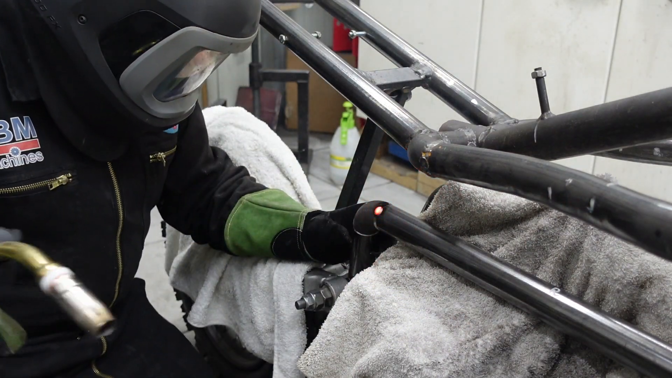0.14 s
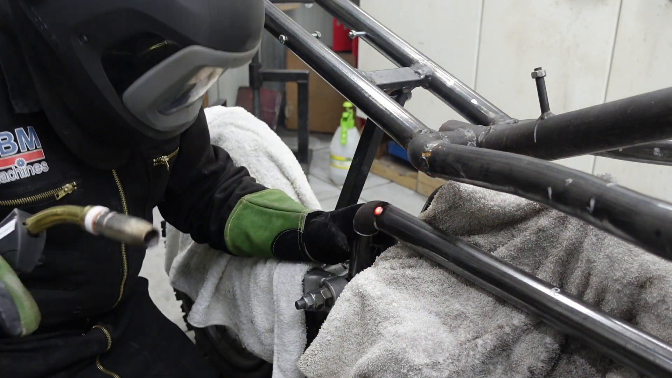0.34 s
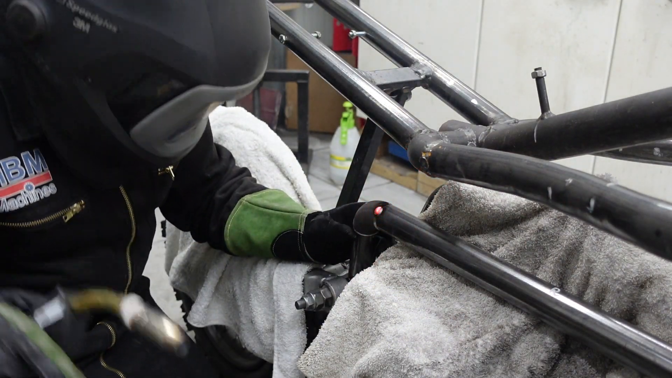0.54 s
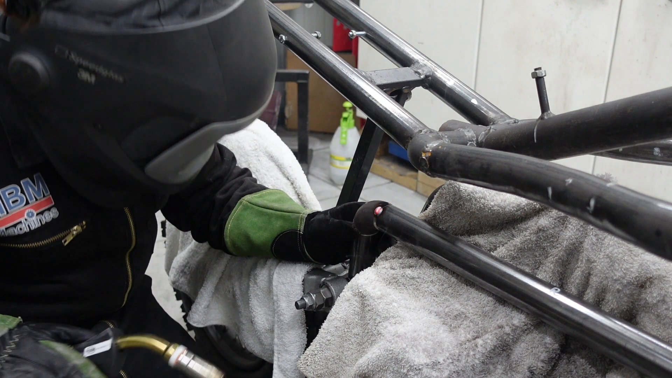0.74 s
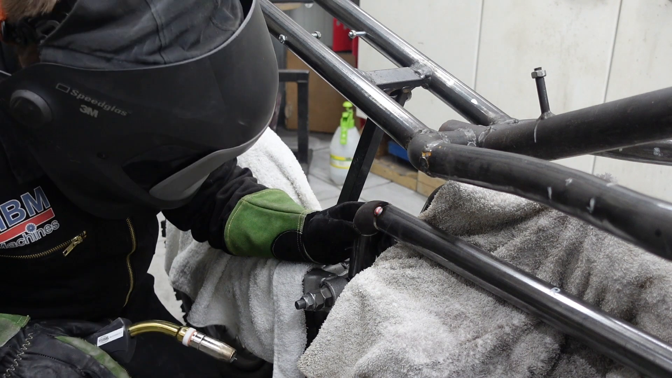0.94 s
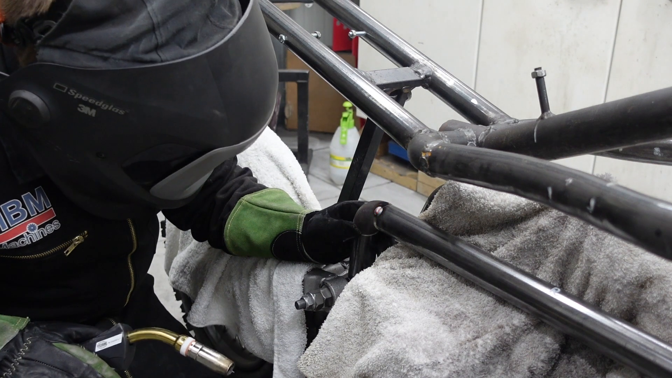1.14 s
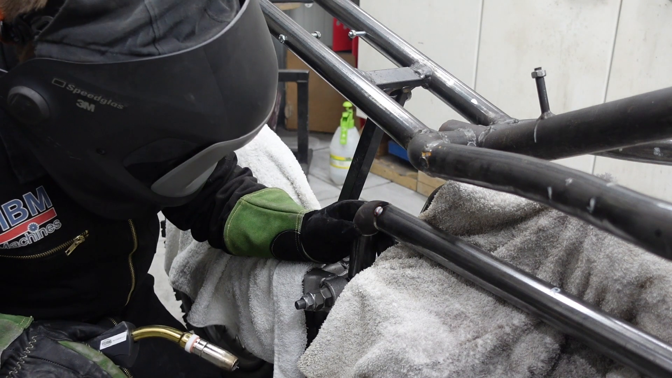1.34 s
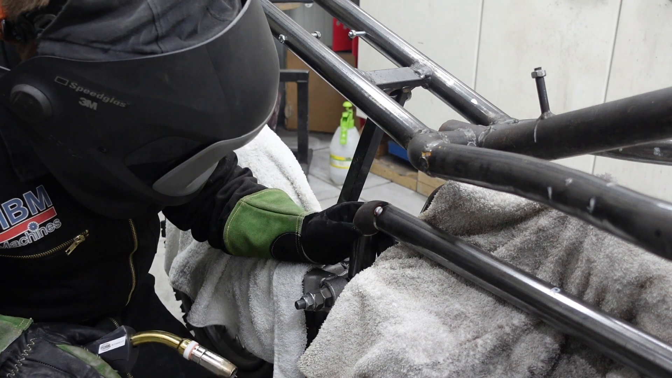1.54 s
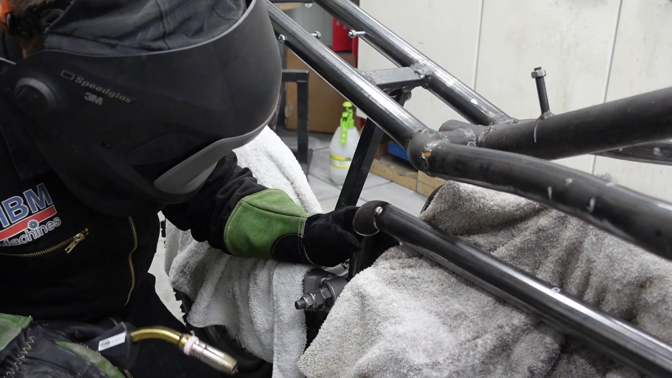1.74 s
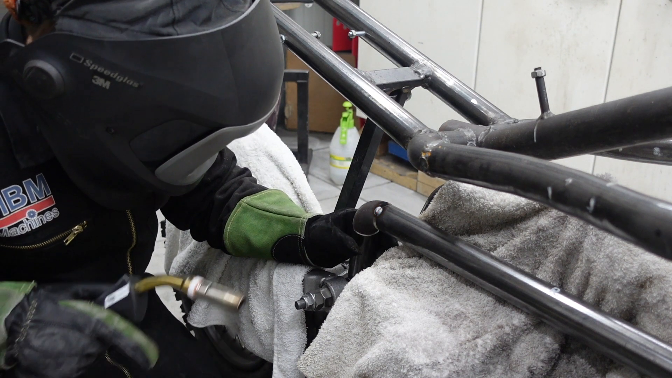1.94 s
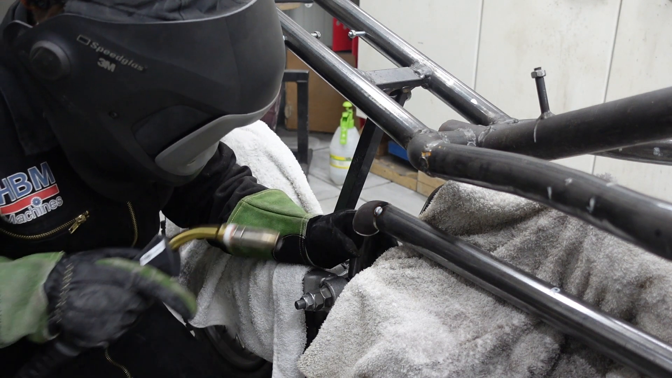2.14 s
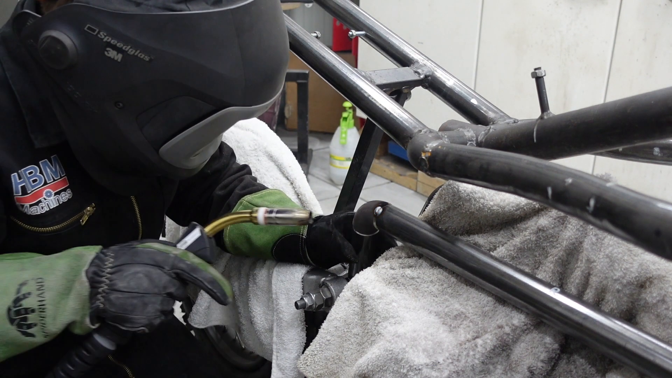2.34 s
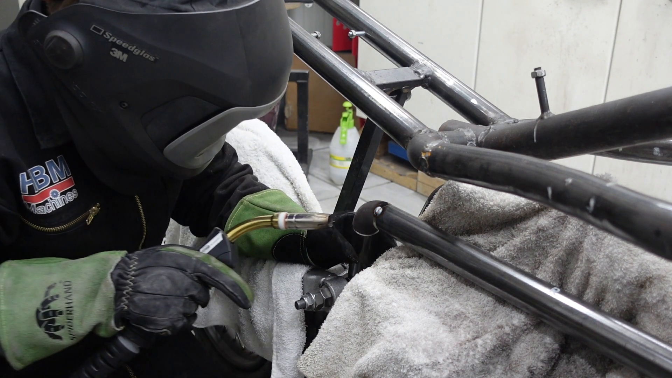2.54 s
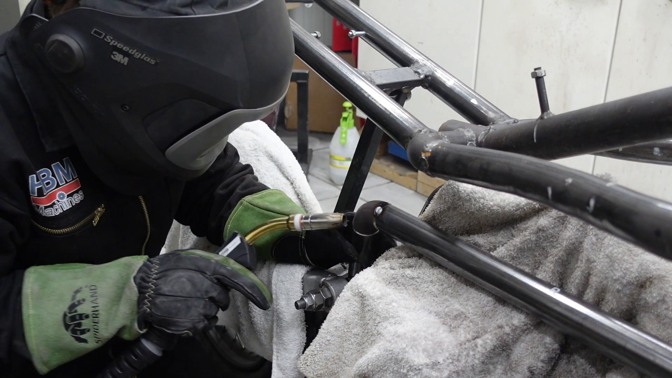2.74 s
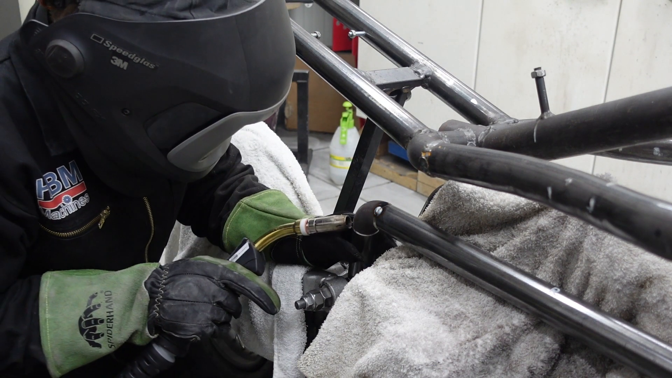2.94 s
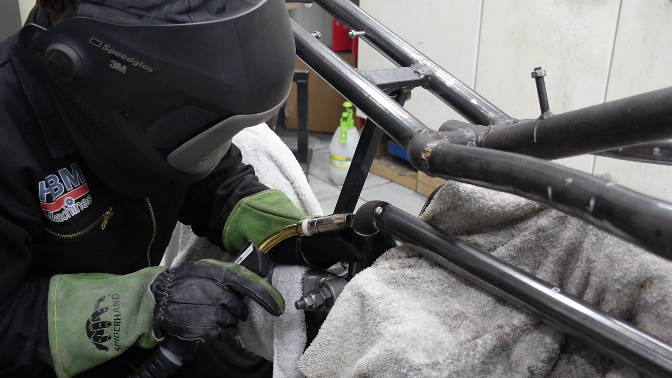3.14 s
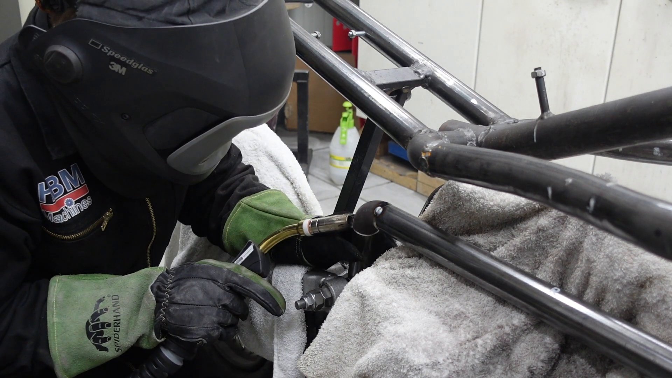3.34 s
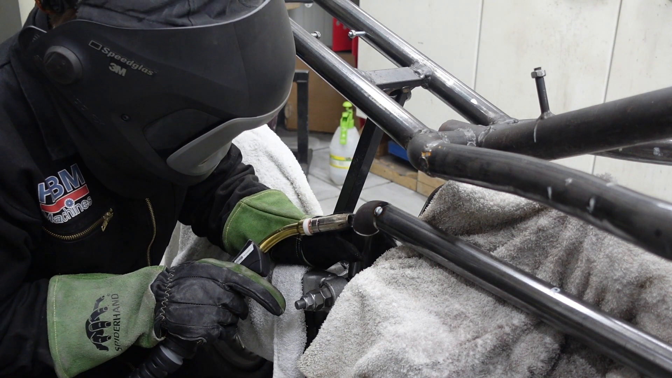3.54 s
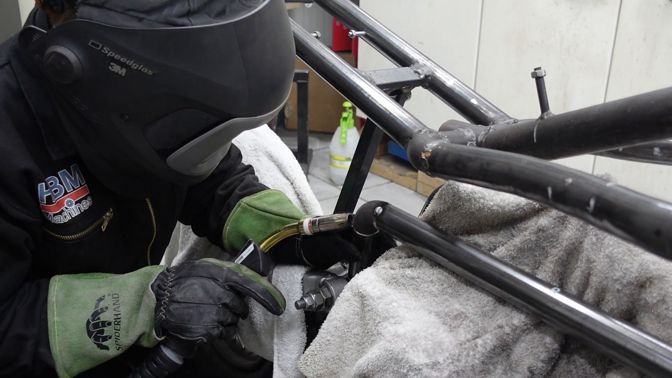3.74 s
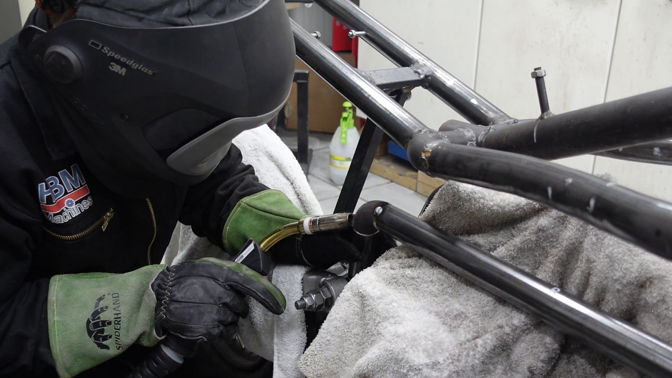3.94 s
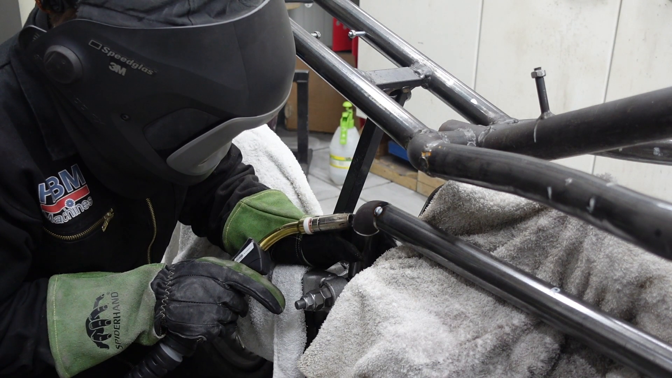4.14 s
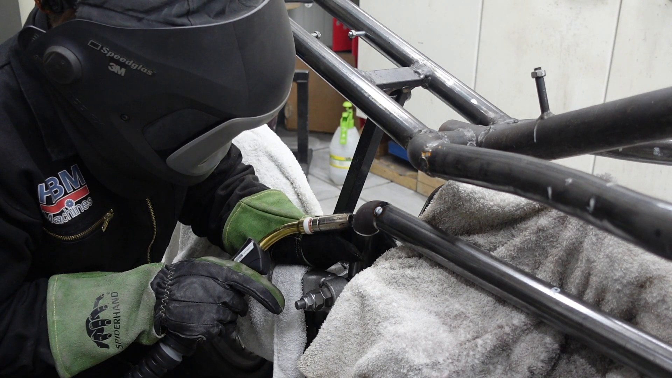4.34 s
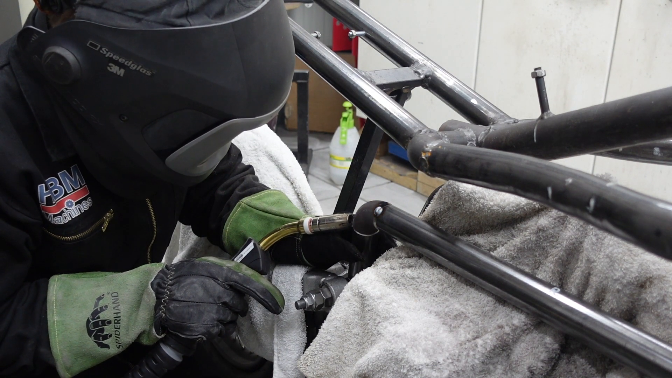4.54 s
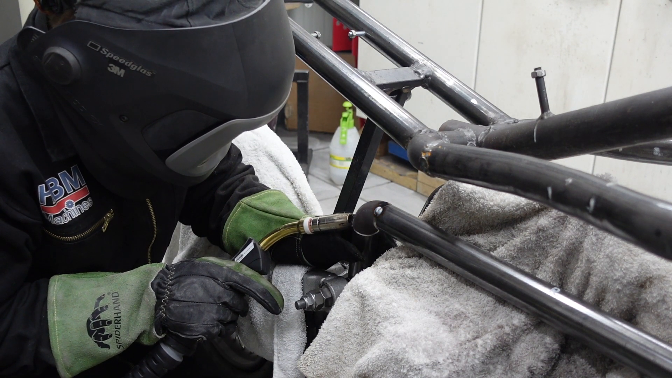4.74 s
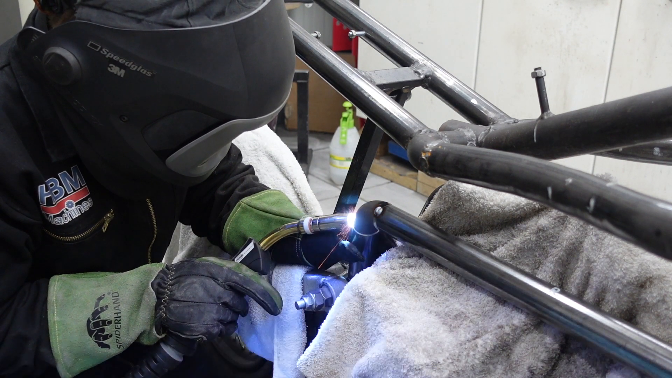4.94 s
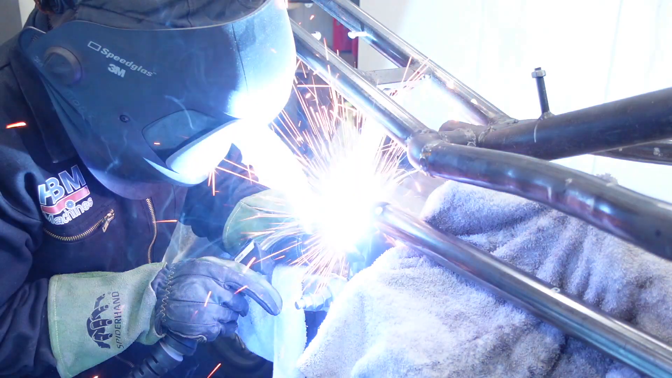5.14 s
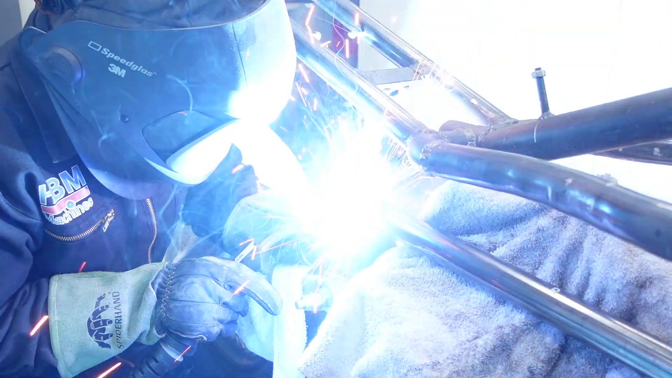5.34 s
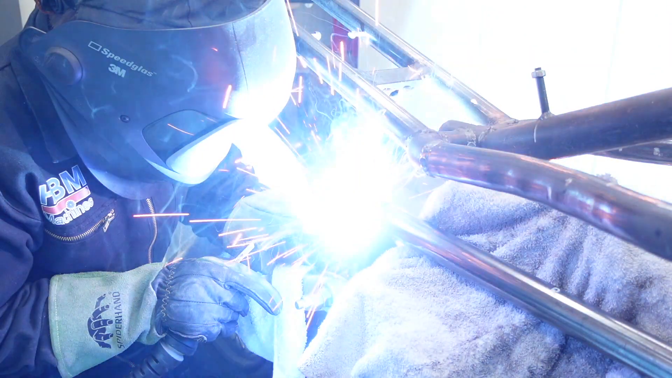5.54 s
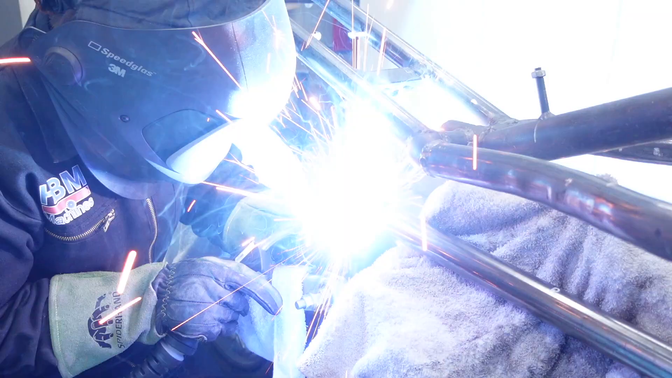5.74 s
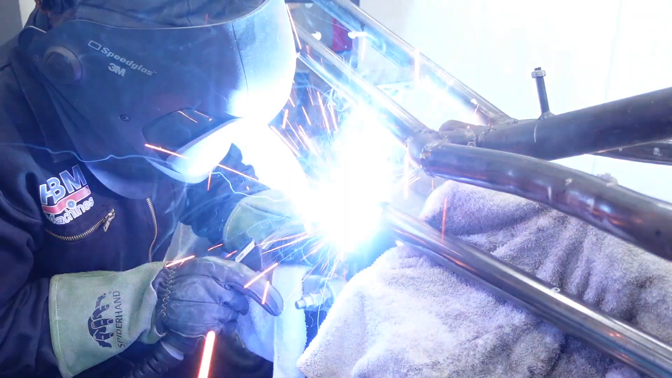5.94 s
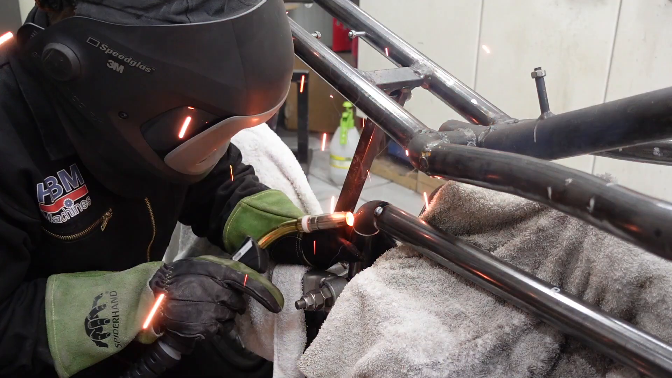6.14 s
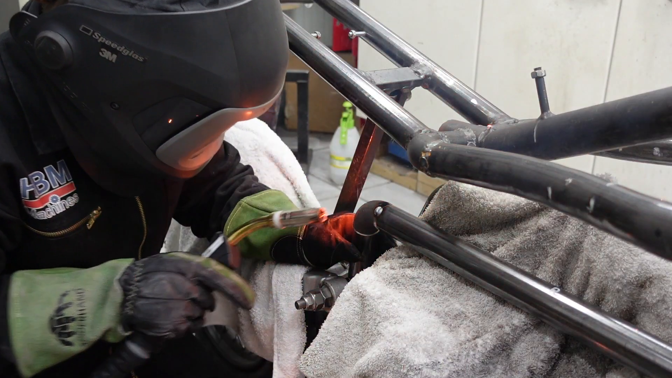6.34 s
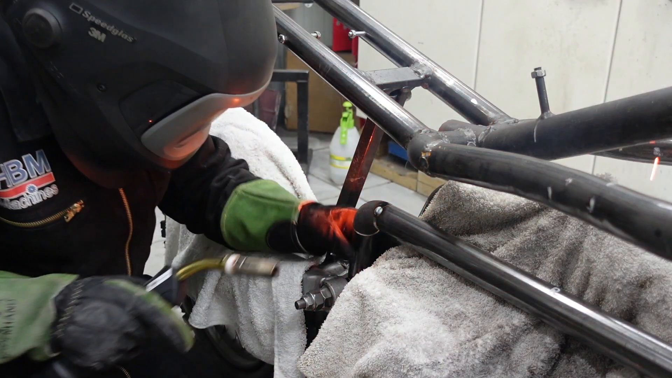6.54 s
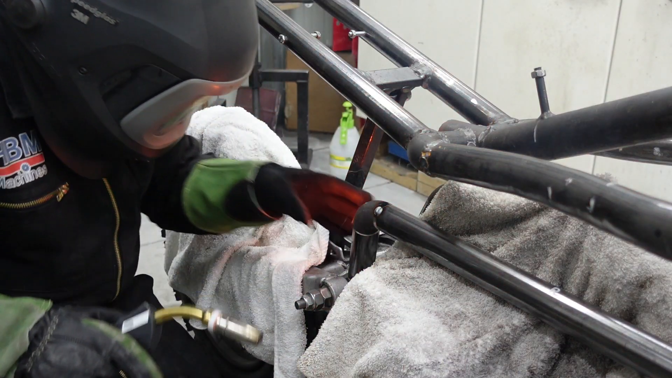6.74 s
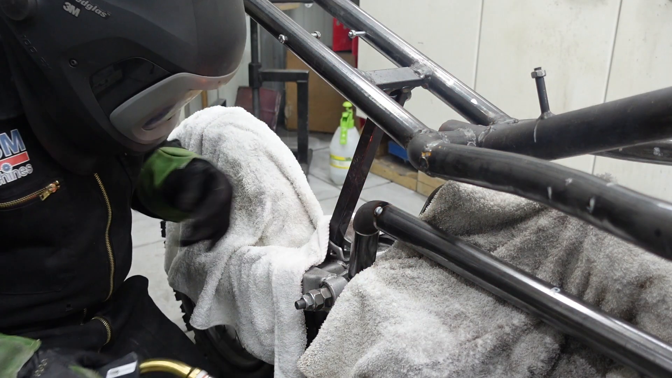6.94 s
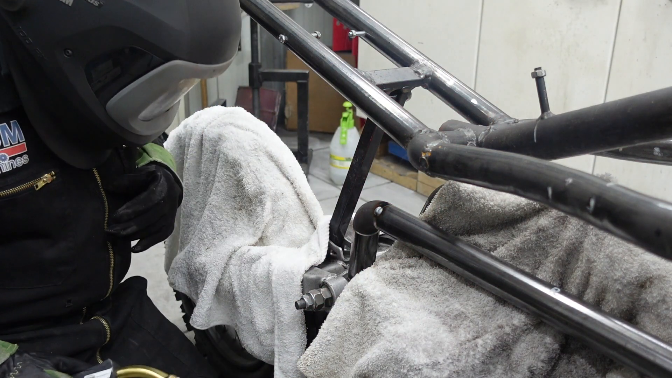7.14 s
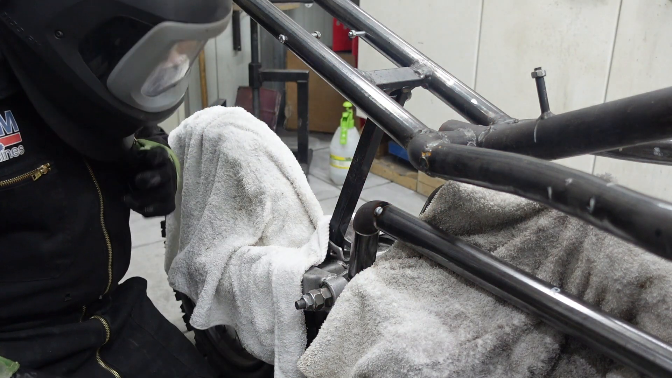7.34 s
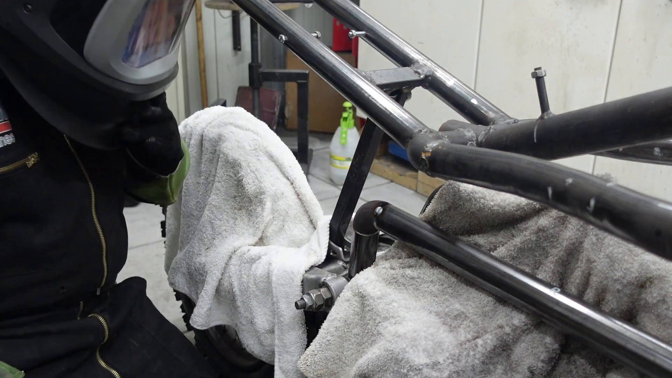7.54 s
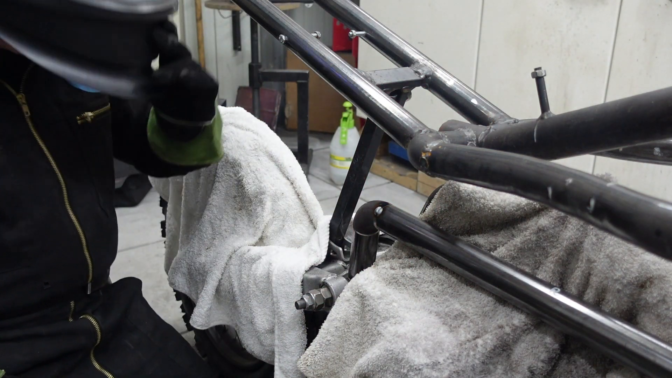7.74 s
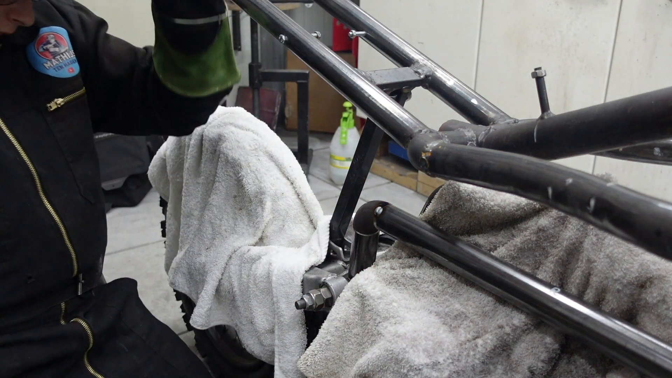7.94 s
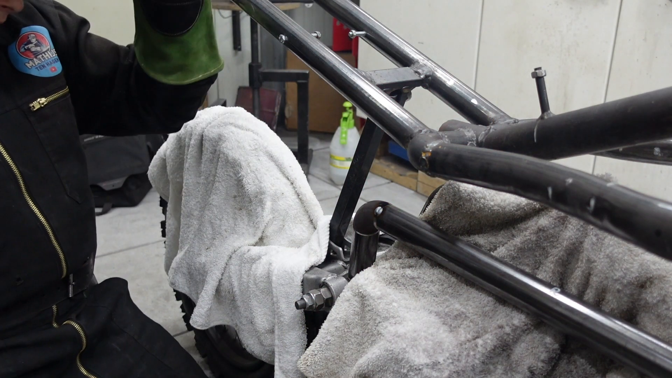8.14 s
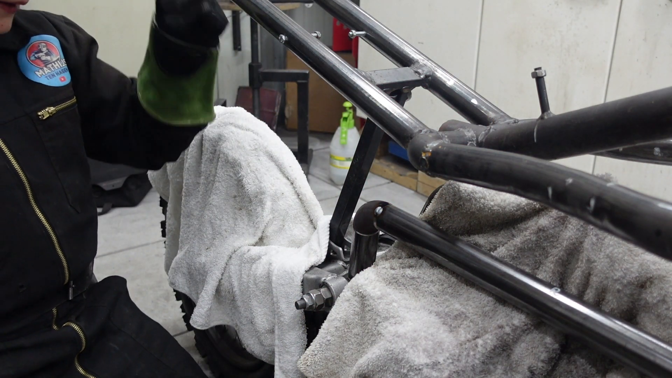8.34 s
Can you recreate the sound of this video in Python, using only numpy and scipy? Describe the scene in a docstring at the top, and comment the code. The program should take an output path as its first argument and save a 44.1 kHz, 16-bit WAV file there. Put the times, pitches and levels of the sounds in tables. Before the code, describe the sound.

Fans hum steadily in a workshop, then a welding torch hisses and crackles fiercely for one second, stops dead, leaving fainter fan hum.

```python
"""Fans of a welding machine whirr in a workshop, with soft faint swells of noise; then a MIG tack weld on tube.
Gas hisses from the torch, the wire strikes, and the arc crackles for a second; steel and room ring out.
Arc: irregular clicks, sparks and noise through a crack filter. Fans: wandering tones over coloured noise.
Gas, puffs and soft swells: shaped noise. A gain control ducks the fans under the arc; they return slowly."""
import sys
import numpy as np
from scipy import signal
from scipy.fft import rfft, irfft, next_fast_len
from scipy.io import wavfile
from scipy.ndimage import uniform_filter1d, minimum_filter1d

SR = 44100
rng = np.random.default_rng(int(sys.argv[2]) if len(sys.argv) > 2 else 0)


def log_audio(samples):
    """Write samples as a 16-bit WAV file to the path given in sys.argv[1]."""
    # one column per channel
    frames = np.atleast_2d(samples).T
    # limit to full scale, then quantise
    limited = np.clip(frames, -1, 1)
    pcm = np.round(limited * 32767).astype(np.int16)
    wavfile.write(sys.argv[1], SR, pcm)


N = 373527
TIME_S = np.arange(N) / SR

# Levels are relative within a table or source, before later gains and the gain control.
# arc strength, builds as the pool heats and weakens as the wire burns back: start_s, level_db
BURN = [(4.98, -15.5), (5.04, -11.5), (5.13, -7), (5.24, -7), (5.39, -5.5), (5.5, -7), (5.63, -5.5),
        (5.69, -6), (5.79, -3), (5.86, -4), (5.92, -4.5), (5.97, -3), (6.01, -7), (6.05, -7.5)]
# wire stubs into the pool, most of them hush the arc: centre_s, length_s, level_db
STUBS = [(5.0215, 0.011, -7), (5.068, .011, 0.5), (5.1308, 0.0054, -6.5), (5.156, 0.0068, -11.5),
         (5.202, 0.015, -1), (5.207, 0.0033, -0.5), (5.2462, 0.004, -6), (5.285, .004, -4.5),
         (5.288, .005, -8), (5.317, 0.0077, -5.5), (5.337, 0.0096, -9.5), (5.353, 0.0035, -3),
         (5.3794, 0.0088, -11), (5.39, 0.0054, -3.5), (5.398, .005, -6.5), (5.414, 0.0055, -11.5),
         (5.4374, 0.0092, -10), (5.47, 0.0043, -4.5), (5.505, .01, 4), (5.528, 0.0035, -6.5),
         (5.544, 0.005, -3), (5.5735, 0.013, -8), (5.615, 0.0071, -1), (5.6746, 0.0045, -7.5),
         (5.6874, .011, -5.5), (5.703, 0.01, -6), (5.7433, 0.012, -12.5), (5.763, 0.0075, -11),
         (5.799, 0.0092, -6), (5.827, 0.0055, -2.5), (5.838, 0.0051, -2), (5.869, 0.0061, 0),
         (5.925, 0.006, -5), (5.946, 0.01, -10), (6.005, 0.0055, -5), (6.044, 0.0045, -3.5)]
# loudest spatter pops, a drop of metal bursts off the wire: start_s, level_db, short_circuit_before_s
POPS = [(5.0104, 3, .002), (5.058, 11, 0.0038), (5.062, 5.5, .001), (5.1274, 10.5, .002),
        (5.149, 8.5, 0.0034), (5.1606, 1.5, 0.0053), (5.168, 5.5, .005), (5.1806, 3, .002),
        (5.187, 9, 0.0039), (5.2327, 9.5, 0.0028), (5.2497, 15, 0.0035), (5.255, 17.5, .001),
        (5.2776, 6.5, 0.0018), (5.3347, 13.5, .002), (5.349, 11.5, .003), (5.371, 11, .006),
        (5.376, 8.5, 0.0011), (5.3975, 5, .006), (5.4067, 10, 0.0033), (5.4287, 14, .002),
        (5.4957, 15, 0.0025), (5.6018, 5, .005), (5.6263, 5, .002), (5.6423, 11, .003), (5.664, 9, 0.004),
        (5.696, 16, .009), (5.7134, 21, .003), (5.7177, 14.5, .001), (5.7272, 19.5, 0.0036),
        (5.7564, 13.5, 0.011), (5.7756, 18.5, .004), (5.7863, 9.5, .002), (5.799, 12.5, .004),
        (5.858, 12, .002), (5.8639, 8.5, .002), (5.9168, 7.5, .003), (5.9494, 14.5, .005),
        (5.993, 18, .002), (5.9985, 9.5, .001), (6.0414, 13, .005), (6.0568, 21.5, .009)]
# colour of one arc crack: freq_hz, density_db_per_hz
CRACK_COLOUR = [(40, -46), (110, -38.5), (220, -27.5), (400, -17), (700, -1), (1300, 0.5), (2100, -7),
                (3300, 3), (6000, 1.5), (8700, 6), (9700, -2.5), (11700, 1), (13800, -6.5), (16000, -8)]
# peaks and notches from nozzle, helmet and tubes around the arc: freq_hz, width_hz, level_db
NOOK_PEAKS = [(1130, 94, -5), (1670, 183, 10.5), (1980, 200, 1.5), (2396, 250, 5), (2720, 250, 0),
              (3050, 110, 2), (4250, 240, -4.5), (4610, 830, 7), (5380, 610, 8), (5830, 270, -8),
              (6350, 130, -8), (6580, 130, 3), (7520, 200, 4), (7530, 120, -4.5), (9350, 100, 3.5),
              (10180, 340, -7.5), (11700, 250, 0.5), (12140, 220, 6), (12850, 250, -7)]
# low puffs of heated air as the arc sputters: centre_s, level_db
SPUTTERS = [(4.976, -33), (4.995, -23), (5.008, -19.5), (5.054, -25), (5.088, -27), (5.108, -20.5),
            (5.249, -30), (5.329, -20.5), (5.562, -28), (5.717, -14.5), (6.056, -18)]
# puff colour: freq_hz, density_db_per_hz
PUFF_COLOUR = [(40, -20.5), (120, -18), (200, -3), (330, 2.5), (500, 13.5), (900, 8), (1500, 10.5),
               (3000, -16), (16000, -45.5)]
# ringing modes of the steel tubes: freq_hz, level_db, t60_s
TUBE_MODES = [(1680, -25, .31), (3425, -26, .29), (4447, -25.5, .23), (4540, -26, .35), (4614, -25, .26),
              (4786, -26, .3), (5028, -25, .27), (5168, -26, .24), (5437, -26, .27), (6535, -25, .29),
              (6919, -25, .3), (8623, -26, .3), (9058, -25, .3), (11035, -23, .25), (13018, -20, .27)]
# standing waves of the workshop, set humming by the arc: freq_hz, level_db, t60_s
ROOM_MODES = [(122, 4.5, .9), (207.6, -1.5, .8), (231.5, 1.5, .9), (295, 1, .9), (377, 0, .8),
              (414.5, -8, .7)]
# workshop reverberation: freq_hz, t60_s
ROOM_T60 = [(250, 0.78), (700, 0.34), (1700, 0.42), (3000, 0.46), (4900, 0.41), (9000, 0.37), (15000, 0.29)]
# reverberation stereo: freq_hz, left_right_likeness (0-1)
ROOM_LIKENESS = [(300, 1), (1500, 0.97), (4500, 0.82), (8000, 0.61), (13000, 0.5)]
# reflections off helmet, frame and floor: delay_s, level_db
ECHOES = [(.0003, -36), (.0008, -17), (.00133, -13), (.00805, -18.5)]
# gas hiss colour: freq_hz, density_db_per_hz
GAS_COLOUR = [(60, -25), (300, -21), (1200, -4), (2500, -1), (4000, -6), (5200, 1), (6200, 10), (9000, 8.5),
              (13000, 1.5), (16000, 0)]
# hiss flare while the arc takes hold: centre_s, length_s, level_db
GAS_FLARE = [(5.098, 0.06, -10)]
# soft swells of faint broadband noise, the early ones may be cloth brushing: centre_s, length_s, level_db
SOFT_SWELLS = [(.42, 0.065, -53), (0.485, 0.036, -48), (.52, 0.085, -52), (7.074, 0.022, -62),
               (7.393, 0.051, -57), (7.55, 0.17, -59), (7.744, .1, -54), (7.9, 0.15, -52),
               (8.003, 0.038, -52), (8.2, 0.23, -55)]
# colour of the soft swells: freq_hz, density_db_per_hz
SOFT_COLOUR = [(40, -25), (130, 2), (300, -7), (2000, 5), (6000, 2), (11000, -11), (16000, -16)]
# tones of the fans, with case and room resonances humming along below 400 Hz: pitch_hz, level_db (rms),
# unsteady_share (0-1)
FAN_TONES = [(231, -66, .9), (292, -71, .8), (371.4, -62, .9), (530, -55, .97), (536.6, -43.6, .05),
             (610.8, -42, .07), (919.8, -51, .1), (1073.1, -52.5, .1), (1221.6, -48.5, .12),
             (1533, -54, .15), (1609.7, -58.5, .2), (1686.3, -60, .2), (2094, -62, .4), (2146.2, -54, .15),
             (2912.7, -65, .3), (3756, -59.5, .5), (6977, -76, .7)]
# tones that wax and wane as the welder leans in and sits back: pitch_hz
WAVERING_HZ = [536.6, 610.8, 1221.6, 2146.2]
# their course: time_s, then one level_db per tone of WAVERING_HZ
WAVER = [(.1, 1, -0.5, 5, 0), (.85, 0.5, 2, 1, -1.5), (1.2, -0.5, 1.5, -2.5, 2.5), (2.25, 0, 1, 2.5, -3.5),
         (2.62, 1.5, 1.5, -3, 2), (2.83, .5, 0.5, 5.5, 0.5), (3.08, 2.5, 1, -7, 3), (3.35, 2, 0.5, 0, 2),
         (4.05, 0, 1, -2.5, 0), (4.75, 1.5, 1, 0.5, 1), (6.7, 1.5, 2, 1, -3.5), (7.1, 0, 0.5, 4, 0),
         (7.6, -1, -5, 2.5, 0), (7.8, 2.5, -1.5, 0, -1), (8.1, 0.5, -2, -0.5, -4), (8.4, 3, -5, -1, 1)]
# air rushing through fans and grille: freq_hz, density_db_per_hz
FAN_AIR_COLOUR = [(30, -38), (110, -31), (170, -27.5), (225, -8.5), (320, -12.5), (375, -3), (470, -3),
                  (650, -5), (850, -1.5), (1020, -1.5), (1330, 1.5), (1950, -8), (3500, -9.5),
                  (5700, -15.5), (8000, -24.5), (11500, -33.5), (15500, -42.5)]
# standing waves of the machine's case, colouring the air: freq_hz, width_hz, level_db
CASE_PEAKS = [(320, 27, -2.5), (440, 36, -5), (505, 21, -6), (575, 18, 0), (633, 20, 3.5), (810, 14, 1.5),
              (894, 14, 3), (1040, 70, -3), (2000, 90, 0), (2910, 100, 1)]
# stereo of fan air and puffs: freq_hz, left_right_likeness (0-1)
AIR_LIKENESS = [(100, 1), (500, 0.96), (1200, 0.78), (4000, 0.6), (12000, 0.43)]
# single gusts in the middle band of the fan air: centre_s, length_s, level_db
GUSTS = [(2.82, 0.1, 0.5), (6.64, .05, 2), (7.38, .05, 4), (7.438, .03, 1.5), (7.52, .1, 3.5),
         (7.713, .15, 2), (7.912, .14, 3), (8.135, .06, 2)]
# noise reducer acts on bands below its knee: freq_hz, knee_db_per_hz
REDUCER_KNEE = [(330, -79), (480, -84), (800, -80), (1200, -86), (2500, -90.5), (5000, -102), (10000, -105)]
# reducer slope: freq_hz, cut_db_per_db_below_knee
REDUCER_SLOPE = [(330, 0.64), (480, 0.38), (600, 0.27), (5000, 0.21), (10000, 0.61)]

STRIKE_S, STOP_S, LIGHT_S, DIE_S = 4.974, 6.056, 0.031, 0.0044
# after a stub: overshoot (share of its level_db, inverted) and settling time constant
RELIGHT_SHARE, RELIGHT_S = 0.19, .009
SPUTTER_LENGTH_S = 0.0086
VALVE_OPEN_S, VALVE_SHUT_S, OPENING_S, SHUTTING_S, FLOW_DB = 4.959, 6.06, 0.0012, .02, -18.5
# gas starts this far from its steady flow and swells to it with this time constant
RISE_DB, RISE_S = -11.5, .008
FAN_AIR_DB, TONES_DB = -38.5, -0.4
# eddies off the blades: band, rms depth, rate
EDDY_LOW_HZ, EDDY_HIGH_HZ, EDDY_DB, EDDY_HZ = 950, 1700, 1, 17
EDGE_HZ = 15850


def arc(dips_per_s=72, spits_per_s=410, sparks_per_s=4200, snap_db=-11, sparks_db=-3, fizz_db=-8,
        bark_db=-6, bark_hz=1900, steady=2.4):
    """The wire dips into the pool and the arc relights with a bark, amid spitting sparks and fizz."""
    relight = flares(train(dips_per_s, uneven=.3, spread_db=3), fade_s=0.0047)
    snaps = train(spits_per_s, uneven=.4, spread_db=2.0)
    flare = 0.22 + np.tanh(0.56 * flares(snaps, fade_s=0.0017))
    sparks = (rng.random(N) < sparks_per_s / SR) * rng.uniform(-1.18, 1, N)
    sizzle = gain_of(sparks_db) * evened(flare * sparks)
    sizzle -= gain_of(snap_db) * evened(snaps)
    sizzle += gain_of(fizz_db) * evened(flare * rng.standard_normal(N))
    body = signal.butter(2, bark_hz, fs=SR, output="sos")
    sizzle -= .5 * signal.sosfiltfilt(body, sizzle)  # thin the lows
    bark = gain_of(bark_db) * 2 * relight * signal.sosfilt(body, rng.standard_normal(N))
    strength = gain_of(np.interp(TIME_S, *np.transpose(BURN)))
    burn = held(STRIKE_S, STOP_S, LIGHT_S, DIE_S) * strength * stalls()
    drive = (sizzle * evened(steady + np.tanh(relight)) + bark) * burn + pops()
    return signal.oaconvolve(drive, crack())[:N]


def stalls(pop_depth=0.37):
    """Short circuits hush the arc: at most stubs, with a hard relight, and just before each pop."""
    level_db = np.zeros(N)
    settle = np.exp(-np.arange(SR // 10) / SR / RELIGHT_S)
    for centre_s, length_s, db in STUBS:
        start = round((centre_s - length_s / 2) * SR)
        end = round((centre_s + length_s / 2) * SR)
        level_db[start:end] += db
        level_db[end:end + len(settle)] -= RELIGHT_SHARE * db * settle
    gain = gain_of(level_db)
    for start_s, _, short_s in POPS:
        gain[round((start_s - short_s) * SR):round(start_s * SR)] *= 1 - np.clip(pop_depth, 0, 1)
    return uniform_filter1d(gain, size=40)


def pops(pops_db=-3.0, spray_db=-2, spray_s=0.000995):
    """Each bursting drop is one sharp snap and a brief spray of fragments."""
    t, out = np.arange(SR // 100) / SR, np.zeros(N)
    for start_s, db, _ in POPS:
        spray = rng.standard_normal(len(t)) * np.exp(-t / spray_s)
        snap = t == 0
        burst = gain_of(spray_db) * spray / np.linalg.norm(spray) - snap
        out[round(start_s * SR):][:len(t)] += gain_of(db + pops_db) * burst
    return out


def crack(size=4096):
    """One causal, minimum-phase snap of the arc, coloured by its surroundings; energy 1."""
    hz = abs(np.fft.fftfreq(size, 1 / SR))
    db = read(CRACK_COLOUR, hz) + bumps(NOOK_PEAKS, hz)
    log_spectrum = np.conj(signal.hilbert(np.log(gain_of(db))))
    snap = np.fft.ifft(np.exp(log_spectrum)).real[:size // 2]
    return snap / np.linalg.norm(snap)


def warm_up(x, body_hz=2500, thin_db=-9, melt_s=0.046):
    """On cold steel the arc is thin; its body fills in as the pool melts."""
    body = signal.sosfiltfilt(signal.butter(2, body_hz, fs=SR, output="sos"), x)
    return x + body * (gain_of(thin_db * coldness(melt_s)) - 1)


def coldness(warming_s):
    """1 when the wire strikes, falling exponentially towards 0 as the steel heats."""
    return np.exp(-np.maximum(TIME_S - STRIKE_S, 0) / warming_s)


def sputters():
    """The arc lights with a few low puffs and throws more as it burns."""
    envelope = sum(swell(centre_s, SPUTTER_LENGTH_S, db) for centre_s, db in SPUTTERS)
    return envelope * hiss(PUFF_COLOUR, AIR_LIKENESS)


def tubes(x, ring_db=-17.5):
    """The steel frame rings along with the arc; level relative to the arc's rms."""
    ring = ringing(TUBE_MODES, SR // 2)
    return gain_of(ring_db) * np.std(x) * evened(signal.oaconvolve(x, ring)[:N])


def workshop(x, wet_db=1.5, direct_same=0.42, build_s=0.0082):
    """Direct sound, a few close reflections, and a dense tail with a decay time per frequency."""
    hz, t, z = signal.stft(rng.standard_normal((2, SR * 3 // 4)), SR, nperseg=256)
    decay = gain_of(-60 * t / read(ROOM_T60, hz)[:, None])
    z = pair(*z, read(ROOM_LIKENESS, hz)[:, None]) * decay
    tail = signal.istft(z, SR, nperseg=256)[1]
    tail *= 1 - np.exp(-np.arange(tail.shape[1]) / SR / build_s)
    response = gain_of(wet_db) * tail / np.linalg.norm(tail[0])
    response[:, 0] += 1
    for k, (delay_s, db) in enumerate(ECHOES):
        # alternate echoes favour left and right
        response[:, round(delay_s * SR)] += gain_of(db) * pair(0.84, (-1) ** k, direct_same)
    return signal.oaconvolve(x[None], response, axes=1)[:, :N]


def standing_waves(x, hum_db=-53):
    """The low modes of the room hum on under the crackle."""
    return gain_of(hum_db) * signal.oaconvolve(x, ringing(ROOM_MODES, SR))[:N]


def gas():
    """The gas hiss starts faint, swells quickly to its steady flow, and flares as the arc takes hold."""
    rise_db = RISE_DB * np.exp(-np.maximum(TIME_S - VALVE_OPEN_S, 0) / RISE_S)
    flow = gain_of(FLOW_DB + rise_db) * held(VALVE_OPEN_S, VALVE_SHUT_S, OPENING_S, SHUTTING_S)
    return (flow + swell(*GAS_FLARE[0]) * stalls()) * hiss(GAS_COLOUR, [(200, 0.99), (10000, 0.43)])


def soft_swells():
    """Soft swells of faint broadband noise."""
    return sum(swell(*row) for row in SOFT_SWELLS) * hiss(SOFT_COLOUR, [(200, .95), (10000, .8)])


def fans(wander=0.00053, flutter_hz=5, tones_same=1.0):
    """Blade tones share a slightly wandering speed and flutter in the rush of air."""
    clock_s = np.cumsum(1 + wander * drift(1.61)) / SR
    out = gain_of(FAN_AIR_DB) * eddies(hiss(FAN_AIR_COLOUR, AIR_LIKENESS, CASE_PEAKS))
    times_s, *levels = np.transpose(WAVER)
    waver_db = {hz: np.interp(TIME_S, times_s, level) for hz, level in zip(WAVERING_HZ, levels)}
    for hz, db, unsteady in FAN_TONES:
        unsteady = np.clip(unsteady, 0, 1)
        angle = 2 * np.pi * (hz * clock_s + rng.random())
        steady = np.sqrt(2 * (1 - unsteady ** 2)) * np.cos(angle)
        flutter = unsteady * (drift(flutter_hz) * np.cos(angle) + drift(flutter_hz) * np.sin(angle))
        tone = pair(steady + flutter, np.sqrt(2) * np.sin(angle), tones_same)
        out += gain_of(TONES_DB + db + waver_db.get(hz, 0)) * tone
    return out


def eddies(air):
    """The air surges unevenly in its middle band as eddies leave the blades."""
    sos = signal.butter(2, [EDDY_LOW_HZ, EDDY_HIGH_HZ], "bandpass", fs=SR, output="sos")
    band = signal.sosfiltfilt(sos, air)
    gusts_db = sum(db * swell(centre_s, length_s, 0) for centre_s, length_s, db in GUSTS)
    return air + band * (gain_of(EDDY_DB * drift(EDDY_HZ) + gusts_db) - 1)


def gain_of(db):
    """Decibels to amplitude."""
    return 10 ** (np.asarray(db) / 20)


def evened(x):
    """Scales to rms 1."""
    return x / np.sqrt(np.mean(x ** 2) + 1e-20)


def read(points, hz):
    """Reads a table on a log-frequency axis."""
    f, value = np.transpose(points)
    return np.interp(np.log(hz + 1), np.log(f + 1), value)


def bumps(table, hz):
    """Peaks and notches as a curve in dB; width is taken at half the dB height."""
    return sum(db * 2 ** -((2 * (hz - f) / width) ** 2) for f, width, db in table)


def drift(rate_hz):
    """Slow random variation of rms 1."""
    knots_per_s = 200
    knots = rng.standard_normal(int(N / SR * knots_per_s) + 2)
    hz = np.fft.rfftfreq(len(knots), 1 / knots_per_s)
    slow = irfft(rfft(knots) * np.exp(-(hz / rate_hz) ** 2), len(knots))
    return evened(np.interp(TIME_S * knots_per_s, np.arange(len(slow)), slow))


def pair(mid, side, same):
    """Two unrelated signals become left and right with the given likeness."""
    same = np.clip(same, 0, 1)
    mid, side = mid * np.sqrt((1 + same) / 2), side * np.sqrt((1 - same) / 2)
    return np.array([mid + side, mid - side])


def hiss(colour, likeness, peaks=()):
    """Stereo coloured noise of rms 1."""
    size = next_fast_len(N)
    hz = np.fft.rfftfreq(size, 1 / SR)
    z = pair(*rfft(rng.standard_normal((2, size))), read(likeness, hz))
    shape = gain_of(read(colour, hz) + bumps(peaks, hz))
    return evened(irfft(z * shape, size)[:, :N])


def ringing(modes, size):
    """Impulse response of decaying modes."""
    t = np.arange(size) / SR
    return sum(gain_of(db - 60 * t / t60_s) * np.cos(2 * np.pi * hz * t) for hz, db, t60_s in modes)


def held(on_s, off_s, attack_s, release_s):
    """Attack, hold and release as a gain for every sample."""
    attack = np.clip((TIME_S - on_s) / attack_s, 0, 1)
    return attack * np.clip(1 - (TIME_S - off_s) / release_s, 0, 1)


def swell(centre_s, length_s, db):
    """A smooth rise and fall around one moment."""
    return gain_of(db) * np.exp(-(2 * (TIME_S - centre_s) / length_s) ** 2)


def train(per_s, uneven, spread_db):
    """Clicks at uneven gaps and of uneven size."""
    gap, chance = rng.standard_normal((2, 8000))
    at = (np.cumsum(np.exp(uneven * gap)) / per_s * SR).astype(int)
    clicks = np.zeros(N)
    clicks[at[at < N]] = gain_of(spread_db * np.tanh(chance[at < N]))
    return clicks


def flares(clicks, fade_s):
    """Each click starts a flare that fades exponentially; rms 1."""
    return evened(signal.lfilter([1], [1, -np.exp(-1 / (fade_s * SR))], clicks))


def scene():
    """The arc sounding in the room, with gas, soft swells and fans."""
    weld, puffs = warm_up(arc()), sputters()
    struck = workshop(weld) + tubes(weld) + standing_waves(weld + puffs.mean(0))
    return struck + puffs + gas() + soft_swells() + fans()


def gain_control(x, threshold_db=-26.0, slope=0.69, hold_s=0.64, recovery_per_s=0.18, start_db=-8):
    """Ducks at once, holds, then creeps back up; it begins still partly ducked."""
    power_db = 10 * np.log10(abs(uniform_filter1d((x ** 2).mean(0), size=1300)) + 1e-12)
    wanted = gain_of(-slope * np.maximum(power_db - threshold_db, 0))
    hold = 2 * int(hold_s * SR / 2) + 1
    # gain is the square of the fader's travel
    fader = np.sqrt(minimum_filter1d(wanted, hold, origin=hold // 2))
    fader[0] = np.sqrt(gain_of(start_db))
    creep = recovery_per_s * TIME_S
    fader = np.minimum.accumulate(fader - creep) + creep
    return x * uniform_filter1d(fader, size=130) ** 2


def hiss_reducer(x, depth_db=12):
    """Turns bands down further once they have been faint for a moment."""
    hz, _, z = signal.stft(x, SR, nperseg=1024, scaling="psd")
    power = uniform_filter1d((abs(z) ** 2).mean(0), size=9, axis=1)
    power = uniform_filter1d(power, size=3, axis=0)
    under_db = read(REDUCER_KNEE, hz)[:, None] - 10 * np.log10(abs(power) + 1e-20)
    cut_db = np.clip(read(REDUCER_SLOPE, hz)[:, None] * under_db, 0, depth_db)
    cut_db = minimum_filter1d(cut_db, size=17, axis=1, origin=8)  # least cut of the last 17 frames
    return signal.istft(z * gain_of(-cut_db), SR, nperseg=1024, scaling="psd")[1][:, :N]


def record(dry, balance_db=0.33):
    """Gain control, hiss reduction, a slightly stronger right channel and the band limit."""
    sound = hiss_reducer(gain_control(dry)) * gain_of([[-balance_db], [balance_db]])
    lowpass = signal.firwin(511, EDGE_HZ, window=("kaiser", 9), fs=SR)
    return signal.oaconvolve(sound, lowpass[None], "same")


dry = scene()
out = record(dry)
log_audio(out)
```